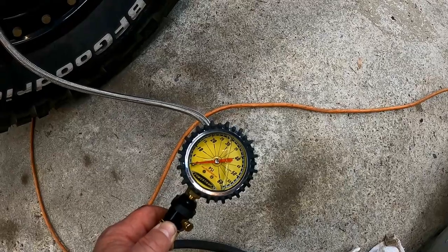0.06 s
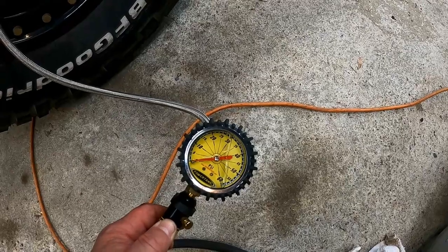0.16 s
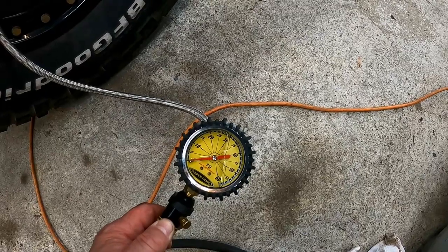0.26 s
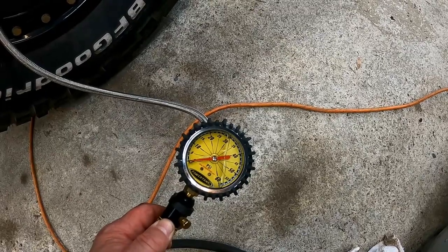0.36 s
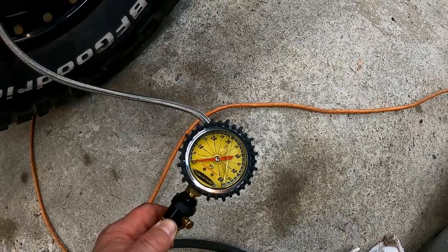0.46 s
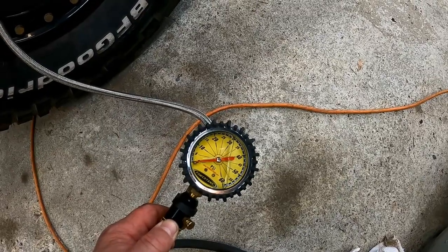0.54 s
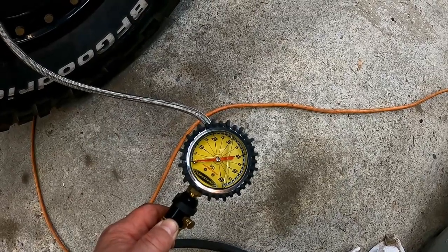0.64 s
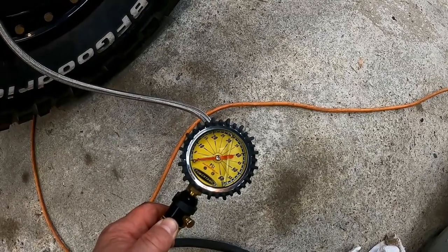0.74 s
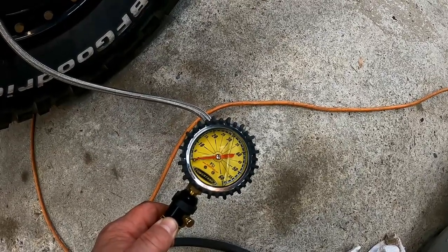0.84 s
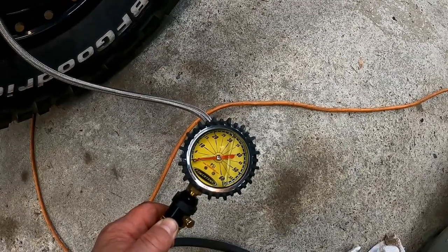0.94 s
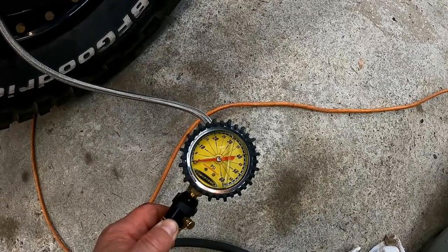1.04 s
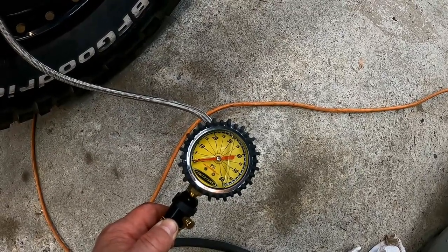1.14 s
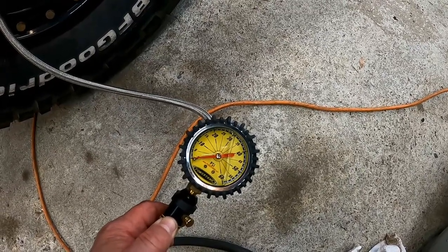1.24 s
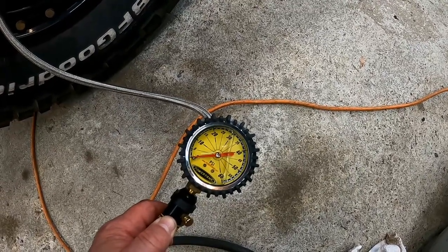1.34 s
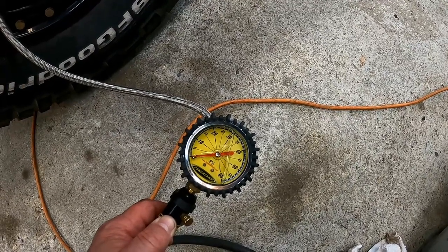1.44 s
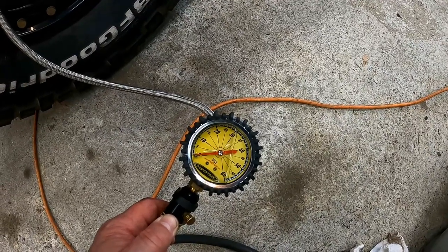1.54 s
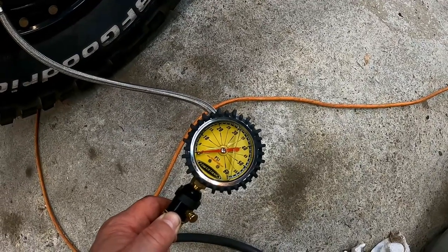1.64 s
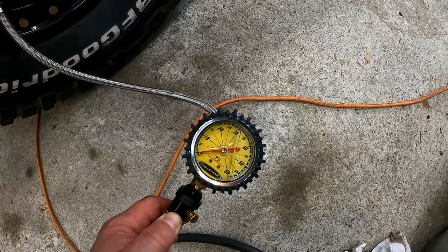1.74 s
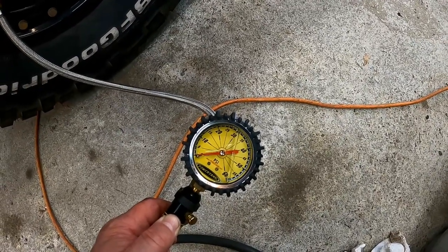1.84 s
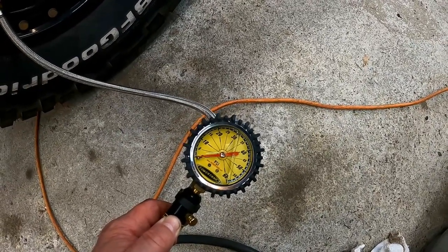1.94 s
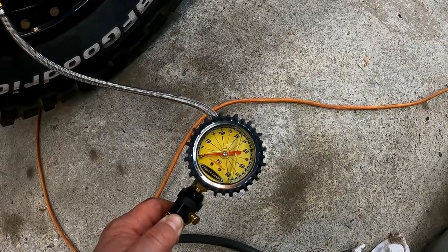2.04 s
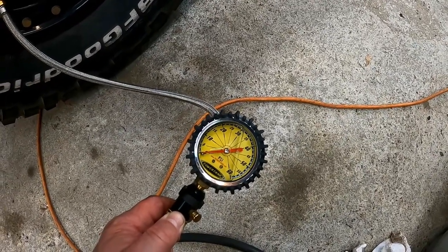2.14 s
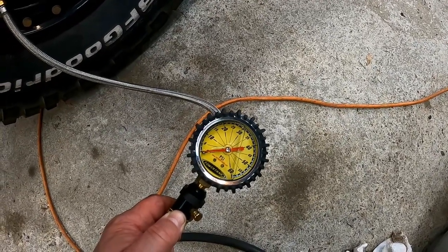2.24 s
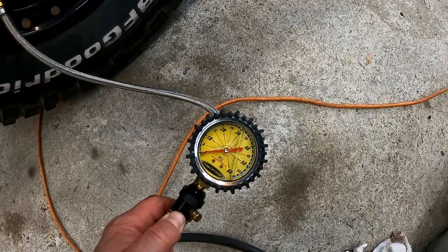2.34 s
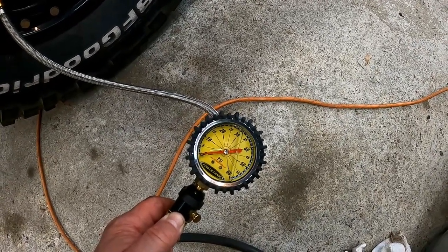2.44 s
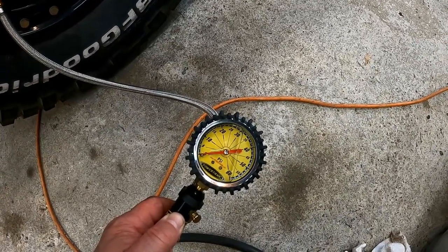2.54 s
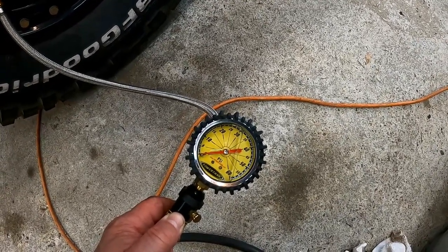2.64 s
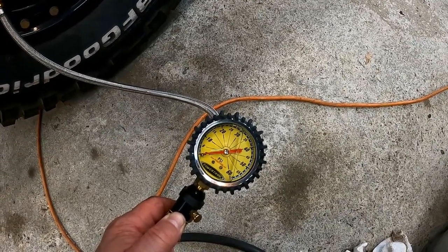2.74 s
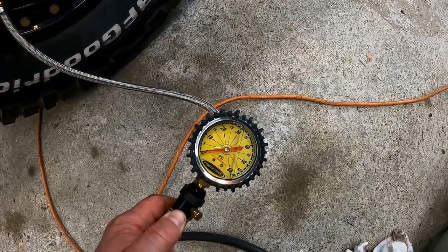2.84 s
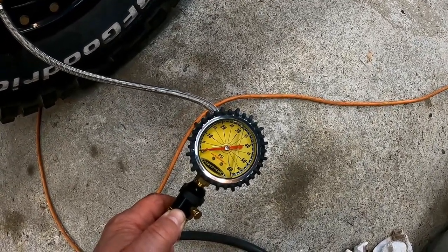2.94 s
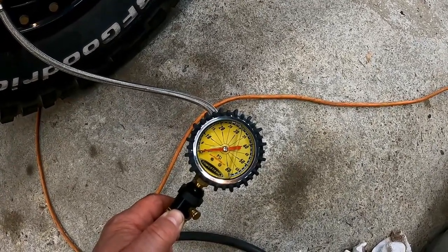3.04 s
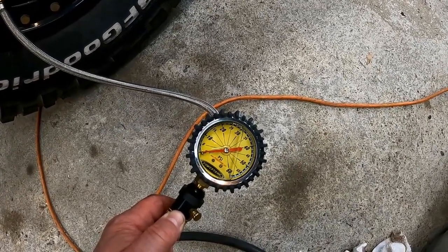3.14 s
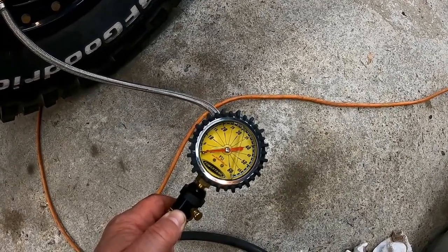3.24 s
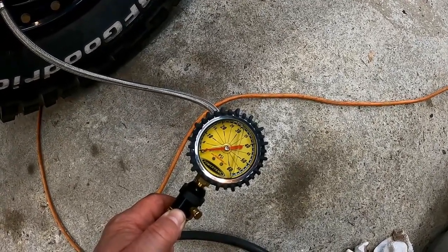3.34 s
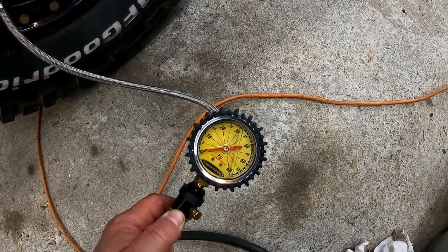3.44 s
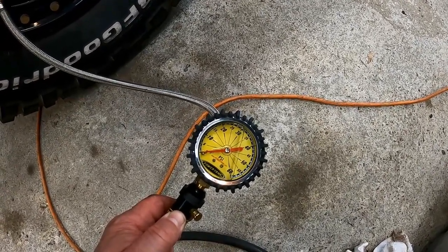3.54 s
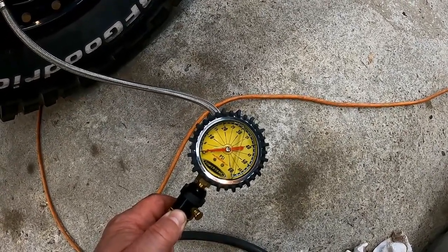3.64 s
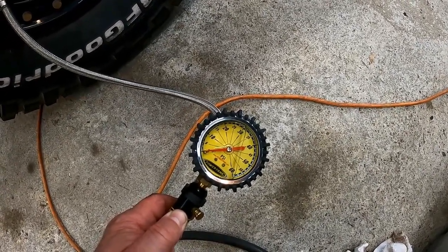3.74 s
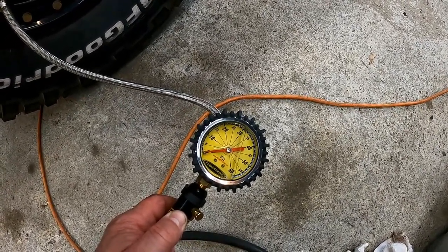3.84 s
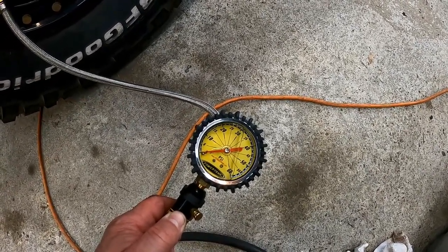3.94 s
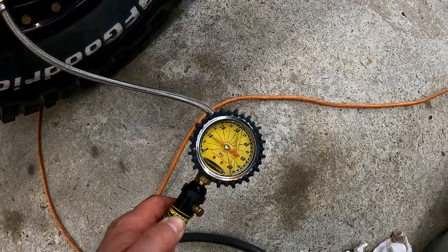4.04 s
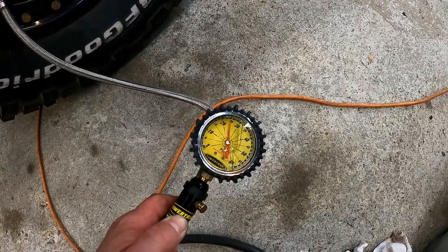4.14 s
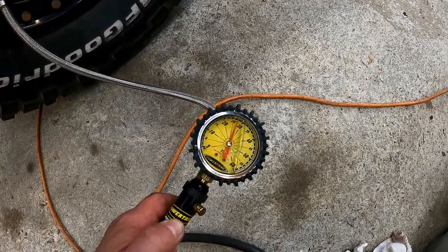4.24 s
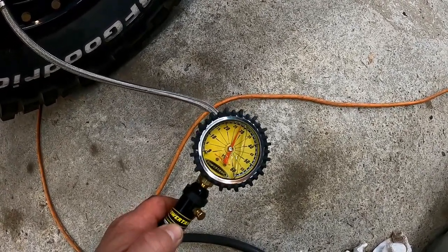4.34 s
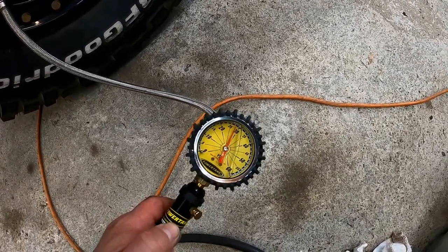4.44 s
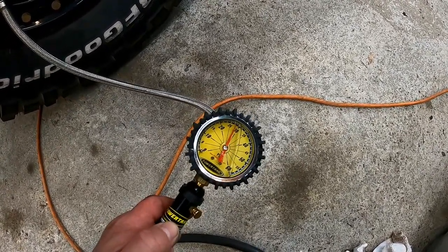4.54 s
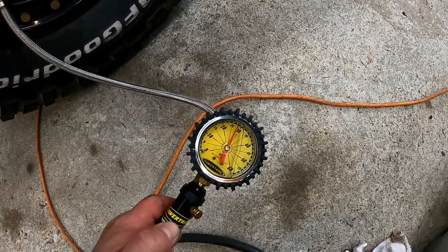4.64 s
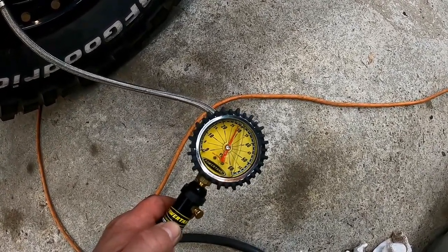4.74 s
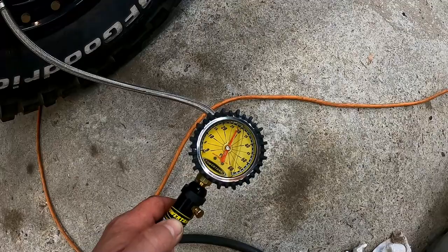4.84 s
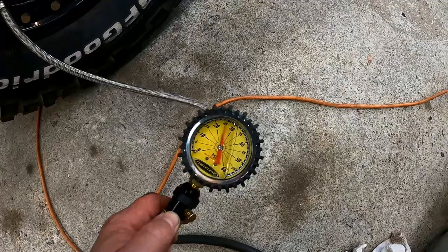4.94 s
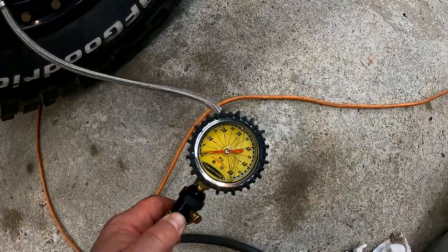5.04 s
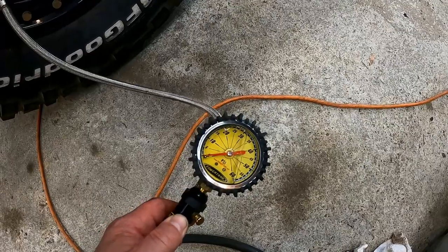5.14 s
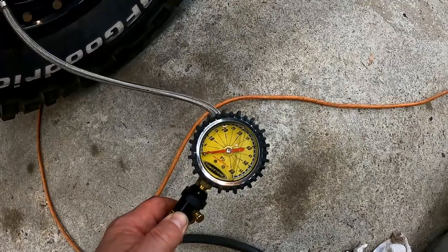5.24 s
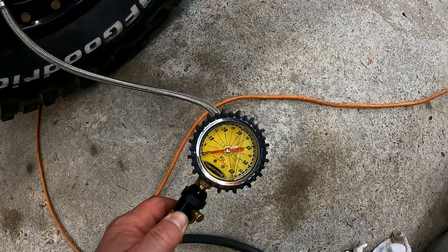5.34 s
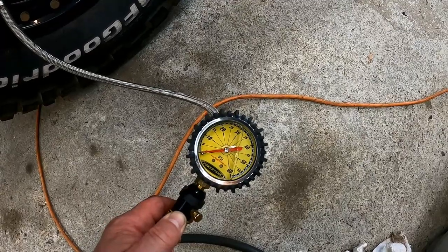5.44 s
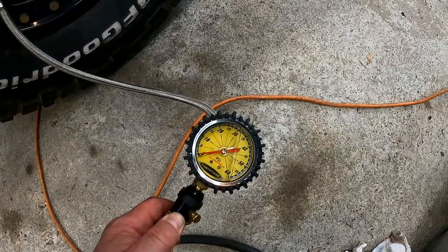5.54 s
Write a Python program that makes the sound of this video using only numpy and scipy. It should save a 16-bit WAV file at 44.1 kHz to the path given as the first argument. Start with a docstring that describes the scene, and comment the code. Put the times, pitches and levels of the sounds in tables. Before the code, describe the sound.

From the start, compressed air hisses steadily through a handheld inflator into a tire, close by. The hiss is bright and even, with a slight metallic ring from the tire, rim and hose, and a very thin high whistle that swells briefly around 3.2 seconds. Four faint, short chirps, perhaps birds outside, come between 2.8 and 3.5 seconds. At about 4.2 seconds the trigger is released with a light tick, and the hiss dies away over half a second. The gap leaves the quiet garage: a low rumble, a soft drone, a far rush and a few very faint chirps. At about 5.1 seconds the valve spits briefly and snaps open with a sharp click, the loudest sound. The hiss returns at once and continues to the end, near 5.7 seconds. Soft, dull bumps from the hand on the grip occasionally sit underneath.

```python
"""Compressed air hisses through a hand-held inflator into a tyre on a garage floor.
Jet turbulence rings tyre, rim and hose; a thin edge tone whistles at the valve.
Trigger released: a tick, and the hiss dies away. Squeezed again: the valve spits, snaps open, hiss resumes.
Underneath: low rumble, a far rush, a drone, soft grip bumps and faint chirps, perhaps birds outside."""
import sys
import numpy as np
from scipy import signal
from scipy.fft import rfft, irfft, next_fast_len
from scipy.io import wavfile

SR = 44100
rng = np.random.default_rng(int(sys.argv[2]) if len(sys.argv) > 2 else 0)


def to_wav(s):
    """Save 16-bit WAV."""
    ch = np.atleast_2d(s).T  # columns
    pcm = np.round(np.clip(ch, -1, 1) * 32767)  # PCM
    wavfile.write(sys.argv[1], SR, pcm.astype(np.int16))


N = 246430
TIME_S = np.arange(N) / SR
FFT_SIZE = next_fast_len(N)
BINS_HZ = np.maximum(np.arange(FFT_SIZE // 2 + 1) * SR / FFT_SIZE, 1)
RELEASE_S, SQUEEZE_S = 4.155, 5.072

# garage rumble: f/Hz, density/dB
GARAGE_SPECTRUM = [(20, -89), (43, -82.5), (75, -93), (130, -86), (210, -87), (300, -93.5), (450, -101.5),
                   (830, -109), (1150, -102), (2500, -109), (6800, -120), (7800, -115), (9000, -124),
                   (13000, -137)]
# rumble and rush: f/Hz, L-R correlation
GARAGE_CORRELATION = [(30, 0.16), (70, 0), (160, 0.33), (300, 0.64), (600, 0.27), (2000, 0.13),
                      (8000, 0.72)]
# far rush at unit gain: f/Hz, density/dB
RUSH_SPECTRUM = [(100, -100), (200, -93.5), (258, -86), (310, -95), (430, -92.5), (550, -99), (660, -96),
                 (830, -107), (1100, -102), (1800, -108), (4000, -125), (9000, -145)]
# rush swells: t/s, half length/s, added gain/dB
RUSH_SWELLS = [(0.272, 0.34, 4), (1.35, 0.17, 4), (2.6, 0.52, -3), (4.85, 0.52, -10.5)]
# building drone: f/Hz, width per stage/Hz, level/dB
DRONE_BANDS = [(163.2, 17.8, -68), (260.2, 16, -78)]
# chirps: t/s, length/s, start f/Hz, end f/Hz, level/dB, rasp/fraction of pitch
CHIRP_GLIDES = [(1.042, .31, 2017, 1850, -57, 0.031), (2.778, 0.028, 2860, 2900, -48.5, 0.0048),
                (2.982, 0.079, 2856, 2896, -49.5, 0.0046), (3.225, .057, 2890, 2884, -48.5, .008),
                (3.48, 0.046, 2890, 2840, -50.5, 0.0081), (4.452, .044, 3860, 4080, -70, .06),
                (4.542, 0.025, 2760, 2610, -65.5, 0.075), (4.798, 0.0375, 4570, 4350, -70, .043),
                (4.931, .027, 3950, 3670, -63, 0.1), (4.936, .021, 2604, 2410, -61.5, 0.067),
                (5.006, 0.022, 2590, 2680, -60, 0.059)]
# hand on the grip: t/s, half length/s, level/dB
GRIP_SWELLS = [(.4, 0.12, -63), (1.2, .1, -65.5), (2.096, .15, -67), (2.8, 0.094, -60), (4.94, 0.037, -60),
               (5.122, 0.059, -54.5)]
# poppet impacts: t/s, level/dB, rise/s, main f/Hz, lower f/Hz, lower level/dB re main
POPPET_HITS = [(4.165, -27, 0.00061, 4800, 3650, -5.5), (5.1253, -7, 0.0004, 6590, 3280, -9)]
# inflator body modes: f/Hz, level/dB re click, t60/s
BODY_MODES = [(513, -42.5, 0.083), (1570, -33, 0.026), (3200, -22, 0.033), (6420, -27, 0.018)]
# valve spit: f/Hz, relative density/dB
SPIT_SPECTRUM = [(300, -25), (800, -22), (1100, -10), (2200, -15.5), (3300, -5), (4400, -5.5), (5300, 0),
                 (6300, 2.5), (7500, -10), (10000, -8), (12000, -18.5), (14000, -32)]
# tyre, rim and hose modes: f/Hz, nominal width/Hz, nominal level/dB, L-R/dB
TYRE_MODES = [(1290, 25, -73, 2), (1636, 32, -64.9, 7), (1744, 16, -70.1, 6), (1851, 16, -62.8, 3),
              (1959, 24, -65.1, 3), (2024, 24, -60.7, 7), (2066, 20, -62.5, 1), (2121, 16, -62.6, 4),
              (2444, 24, -59.1, 5), (2497, 16, -61.0, 4), (2530, 16, -60.8, 7), (2777, 32, -62.5, 6),
              (2863, 16, -62.3, 5), (2898, 18, -65, 3), (3423, 24, -60.1, 2), (3843, 32, -67.7, 8),
              (3919, 24, -60.9, 15), (4435, 16, -67.6, 7), (5071, 16, -64.5, 7), (5450, 90, -65, 6),
              (6459, 24, -57.1, 6), (6535, 32, -56.5, 8), (6605, 40, -61, 4), (6772, 16, -68.3, 8),
              (6879, 24, -62.7, 6), (9270, 32, -71.0, 2), (10206, 16, -68.8, 7), (10292, 14, -68.4, 2),
              (10572, 32, -69.3, 9), (12962, 32, -76.6, 3)]
# jet hiss before reflections: f/Hz, density/dB
JET_SPECTRUM = [(870, -118), (1010, -92), (1500, -93), (1800, -87), (2600, -88), (3200, -86), (4000, -90),
                (5100, -84.5), (5800, -86.5), (6500, -83.5), (7200, -87), (9000, -95.5), (10200, -88.5),
                (11600, -100), (14000, -107)]
# jet balance: f/Hz, L-R/dB
JET_BALANCE = [(900, 0), (1500, 4), (3500, 3), (5000, 3.5), (6500, 3), (7800, 11), (8600, -3), (10000, 8),
               (11600, -7.5), (13000, 12), (14200, -29)]
# jet width: f/Hz, L-R correlation
JET_CORRELATION = [(900, 0.66), (2000, 0.6), (4000, 0.47), (6500, 0.43), (8000, 0.15), (10000, -0.45),
                   (13000, 0.66)]


def from_db(db):
    """Decibels to gain."""
    return 10 ** (np.asarray(db) / 20)


def per_bin(table):
    """Table interpolated at each FFT bin, log frequency."""
    hz, value = np.transpose(table)
    return np.interp(np.log(BINS_HZ), np.log(hz), value)


def unit_rms(x):
    """Scale to rms 1."""
    return x / np.sqrt(np.mean(x ** 2) + 1e-20)


def pan(pan_db):
    """Constant-power L and R gains."""
    gains = from_db(np.array([[.5], [-.5]]) * pan_db)
    return gains / np.sqrt(np.mean(gains ** 2, axis=0))


def swell(centre_s, half_length_s, peak_db):
    """Gaussian gain envelope."""
    return from_db(peak_db) * np.exp(-((TIME_S - centre_s) / half_length_s) ** 2)


def drift(rate_hz):
    """Low-passed random wander, rms 1."""
    r = np.exp(-2 * np.pi * rate_hz / SR)
    slow = signal.lfilter([1], [1, -2 * r, r * r], rng.standard_normal(N + SR))
    return unit_rms(slow[SR:])


def noise(density_db, correlation, pan_db=0):
    """Stereo noise of given spectral density, L-R correlation and balance."""
    mid, side = rfft(rng.standard_normal((2, FFT_SIZE))) * np.sqrt(SR / 4)
    stereo = np.sqrt(1 + correlation) * mid + np.sqrt(1 - correlation) * side * [[1], [-1]]
    return irfft(stereo * from_db(density_db) * pan(pan_db), FFT_SIZE)[:, :N]


def resonance(x, hz, width_hz):
    """Two-pole resonator, unit rms gain for white noise."""
    r = np.exp(-np.pi * width_hz / SR)
    numerator = np.sqrt((1 - r * r) / 2) * np.array([1, 0, -1])
    return signal.lfilter(numerator, [1, -2 * r * np.cos(2 * np.pi * hz / SR), r * r], x)


def echoes(x, t60_s):
    """Dense decaying reflections, independent per ear, unit energy."""
    t = TIME_S[:SR // 2]
    tail = rng.standard_normal((2, len(t))) * from_db(-60 * t / t60_s) * (t > .001)
    tail /= np.sqrt(np.sum(tail ** 2) / 2)
    return signal.fftconvolve(np.atleast_2d(x), tail, axes=1)[:, :N]


def garage(steady_rush_db=-7.5):
    """Steady rumble plus a far, swelling rush, perhaps traffic."""
    correlation = per_bin(GARAGE_CORRELATION)
    rush_gain = from_db(steady_rush_db) + sum(swell(*row) for row in RUSH_SWELLS)
    rush = rush_gain * noise(per_bin(RUSH_SPECTRUM), correlation)
    return noise(per_bin(GARAGE_SPECTRUM), correlation, pan_db=.5) + rush


def drone():
    """Two wavering low tones in the building; the lower swells once."""
    gains = [from_db(level_db) for _, _, level_db in DRONE_BANDS]
    gains[0] = gains[0] + swell(centre_s=4.42, half_length_s=.096, peak_db=-62.5)
    out = np.zeros(N)
    for gain, (hz, width_hz, _) in zip(gains, DRONE_BANDS):
        band = resonance(rng.standard_normal(N), hz, width_hz)
        out += gain * unit_rms(resonance(band, hz, width_hz))
    return out


def chirps():
    """Far raspy glides, heard only by reflection."""
    out, wobble = np.zeros(N), drift(rate_hz=300)
    for start_s, length_s, start_hz, end_hz, level_db, rasp in CHIRP_GLIDES:
        progress = np.clip((TIME_S - start_s) / length_s, 0, 1)
        pitch_hz = (start_hz + (end_hz - start_hz) * progress) * (1 + rasp * wobble)
        envelope = 4 * from_db(level_db) * np.sqrt(progress * (1 - progress))
        out += envelope * np.sin(2 * np.pi * np.cumsum(pitch_hz) / SR)
    return echoes(out, t60_s=.36)


def grip_bumps(band_hz=(30, 100)):
    """Dull swells of rumble from the hand on the grip."""
    envelope = sum(swell(*row) for row in GRIP_SWELLS)
    bandpass = signal.butter(2, band_hz, "band", fs=SR, output="sos")
    rumble = signal.sosfilt(bandpass, noise(density_db=0, correlation=.5))
    return envelope * unit_rms(rumble) * pan(2.1)


def valve_clicks(bounce_s=.00214, bounce_db=-17, near_db=-13, room_db=-24):
    """Poppet hits its seat: two-tone snap, one bounce, body ring, echoes."""
    out = np.zeros(N)
    for start_s, level_db, rise_s, main_hz, lower_hz, lower_db in POPPET_HITS:
        t = np.maximum(TIME_S - start_s, 0)
        envelope = (t / rise_s * np.exp(1 - t / rise_s)) ** 2
        lower = from_db(lower_db) * np.sin(2 * np.pi * lower_hz * t)
        snap = envelope * (np.sin(2 * np.pi * main_hz * t) + lower)
        bounce = from_db(bounce_db) * np.interp(TIME_S - bounce_s, TIME_S, snap)
        body = sum(from_db(db - 60 * t / t60_s) * np.sin(2 * np.pi * hz * t)
                   for hz, db, t60_s in BODY_MODES)
        out += from_db(level_db) * (snap + bounce + body)
    near = from_db(near_db) * echoes(out, t60_s=.026)
    room = from_db(room_db) * echoes(out, t60_s=.21)
    return out * pan(1.1) + near + room


def valve_spit(level_db=-30.5, sputter_db=2, attack_s=.0034, build_s=.039, hold_s=.015,
               build_db_per_s=623, fall_db_per_s=850):
    """Air sputters through the half-open valve: builds, holds, dies as it snaps open."""
    t = TIME_S - SQUEEZE_S
    build_db = build_db_per_s * np.minimum(t - build_s, 0)
    fall_db = fall_db_per_s * np.maximum(t - build_s - hold_s, 0)
    envelope_db = level_db + build_db - fall_db + sputter_db * drift(rate_hz=250)
    envelope = np.clip(t / attack_s, 0, 1) * from_db(envelope_db)
    return envelope * unit_rms(noise(per_bin(SPIT_SPECTRUM), correlation=.43))


def air_flow(bleed_db_per_s=71.5, leak_db=-41, opening_s=.028):
    """Flow, 1 = full: the hose bleeds down to a leak on release; a squeeze restores it."""
    bleeding = from_db(-bleed_db_per_s * np.maximum(TIME_S - RELEASE_S, 0))
    shut = np.clip(1 - (TIME_S - SQUEEZE_S) / opening_s, 0, 1)
    return np.maximum(bleeding, from_db(leak_db * shut))


def valve_whistle(flow, hz=10290, level_db=-82, waver_hz=18, waver_db=3):
    """Unsteady edge tone; catches and swells once."""
    pitch_hz = hz + waver_hz * drift(rate_hz=32)
    gain = from_db(level_db + waver_db * drift(rate_hz=1.8))
    catch = swell(centre_s=3.2, half_length_s=.15, peak_db=-61)
    tone = unit_rms(np.sin(2 * np.pi * np.cumsum(pitch_hz) / SR))
    return flow * (gain + catch) * tone * pan(2.5)


def tyre_ring(flow, trim_db=.33, side_gain=.47, skirt_hz=170, width_scale=.5, knee_hz=3000):
    """Turbulence rings tyre, rim and hose; modes above the knee need more flow."""
    mid, side = rng.standard_normal((2, 2, 1, N))
    turbulence = (mid + side_gain * side * [[1], [-1]]) / np.hypot(1, side_gain)
    out = np.zeros((2, N))
    for k, (hz, width_hz, level_db, pan_db) in enumerate(TYRE_MODES):
        force = flow ** np.clip(hz / knee_hz, 1, 1.8)
        skirt = signal.iirpeak(hz, hz / (2 * skirt_hz), fs=SR)
        drive = signal.lfilter(*skirt, turbulence[k % 2] * force)  # adjacent modes: independent noise
        out += from_db(level_db + trim_db) * pan(pan_db) * resonance(drive, hz, width_scale * width_hz)
    return out


def jet_hiss(flow, flutter_db=.82, dull_hz=5000):
    """Broad turbulent hiss; treble fades first as flow drops."""
    direct = noise(per_bin(JET_SPECTRUM), per_bin(JET_CORRELATION), per_bin(JET_BALANCE))
    hiss = .9 * direct + .38 * echoes(direct, t60_s=.11)  # combed by spokes, rim and floor
    dull = signal.sosfilt(signal.butter(1, dull_hz, fs=SR, output="sos"), hiss)
    brightness = flow ** .69
    flutter = from_db(flutter_db * drift(rate_hz=11))
    return flow * flutter * (brightness * hiss + (1 - brightness) * dull)


def scene():
    """One flow drives hiss, ring and whistle; the other sources add on top."""
    flow = air_flow()
    air = jet_hiss(flow) + tyre_ring(flow) + valve_whistle(flow)
    return air + valve_spit() + valve_clicks() + chirps() + grip_bumps() + garage() + drone()


def record(dry):
    """Steep elliptic low-pass."""
    cutoff_hz = 14400
    return signal.sosfilt(signal.ellip(10, .1, 70, cutoff_hz, fs=SR, output="sos"), dry)


dry = scene()
out = record(dry)
to_wav(out)
```